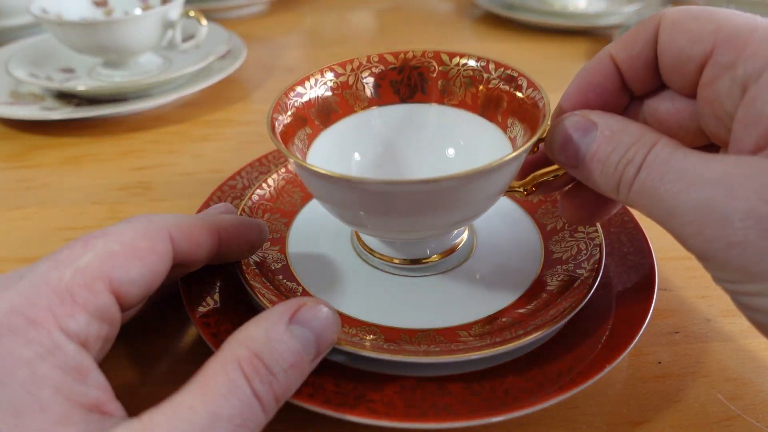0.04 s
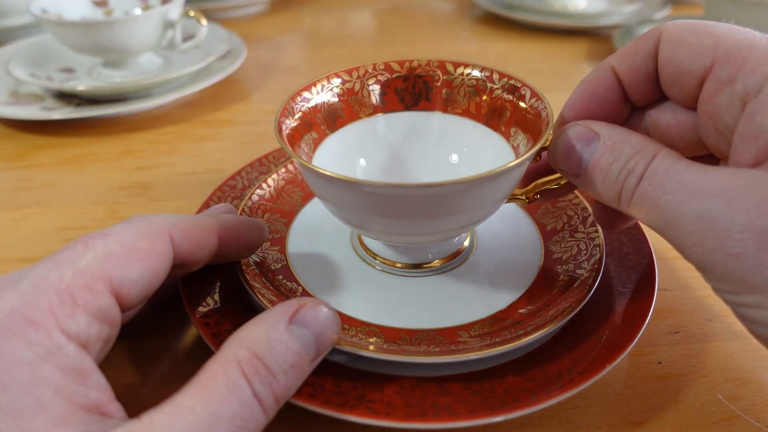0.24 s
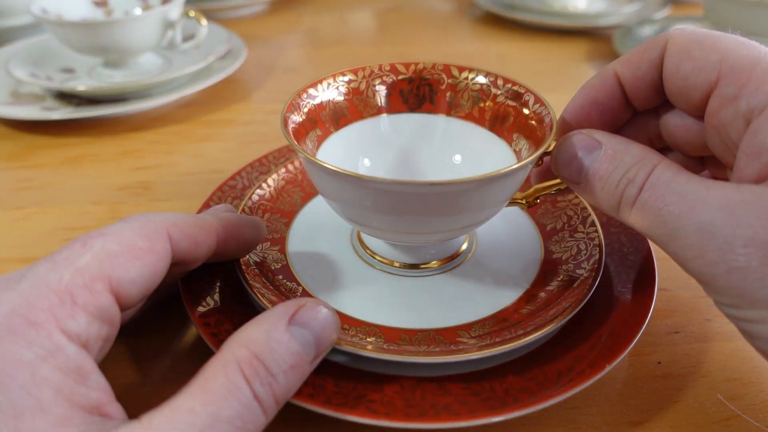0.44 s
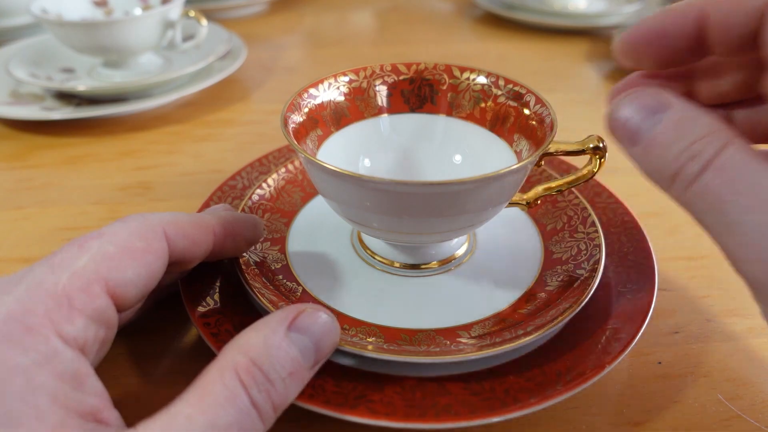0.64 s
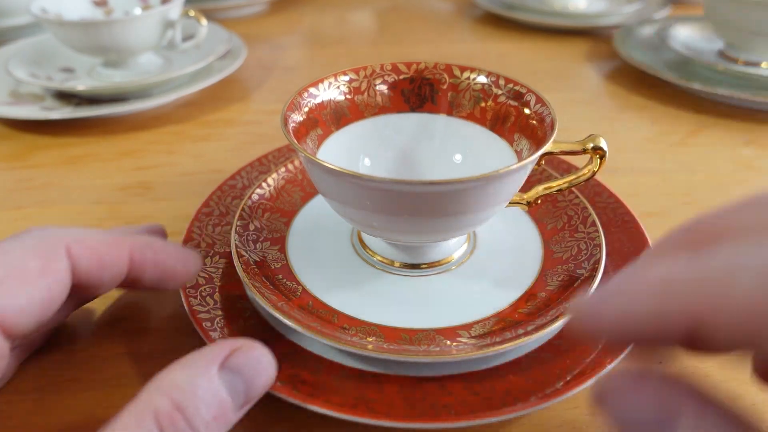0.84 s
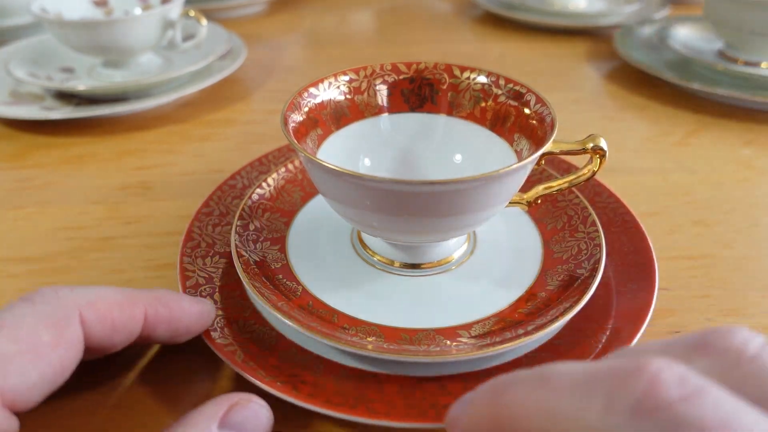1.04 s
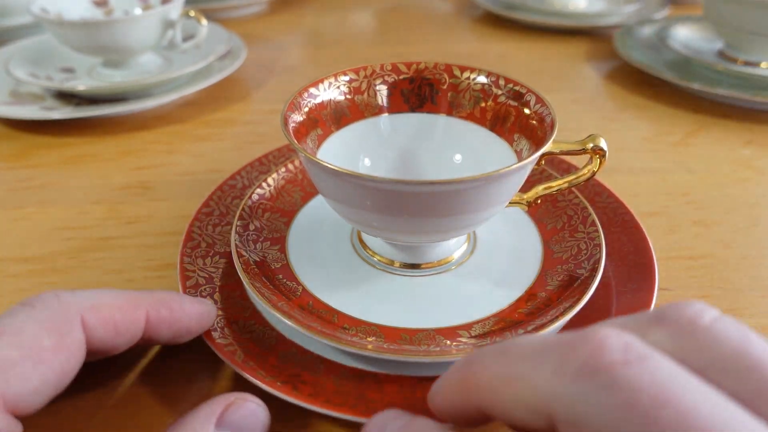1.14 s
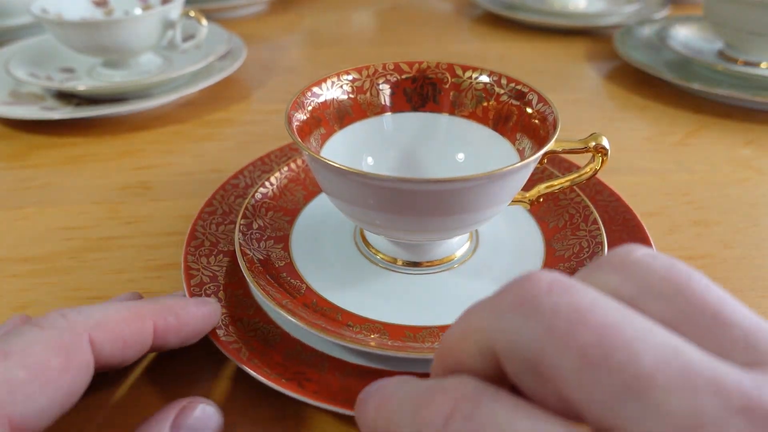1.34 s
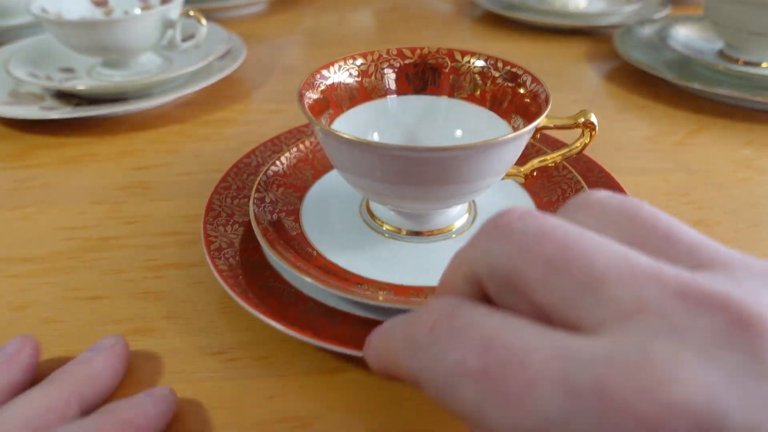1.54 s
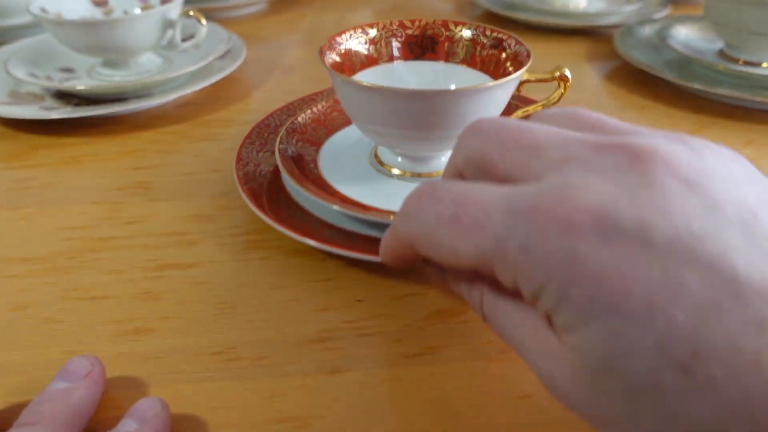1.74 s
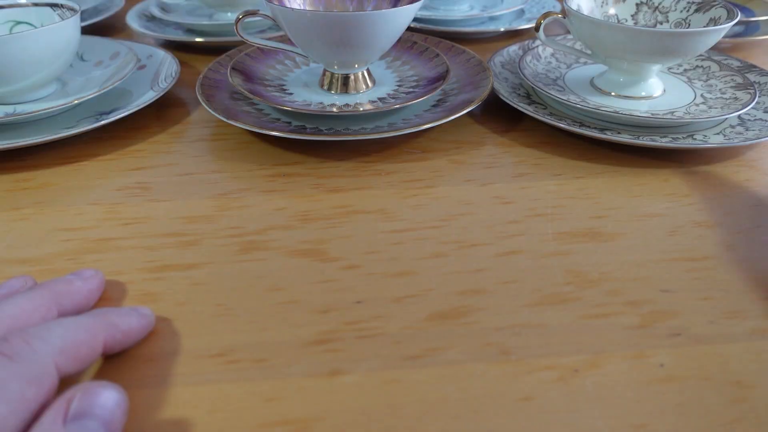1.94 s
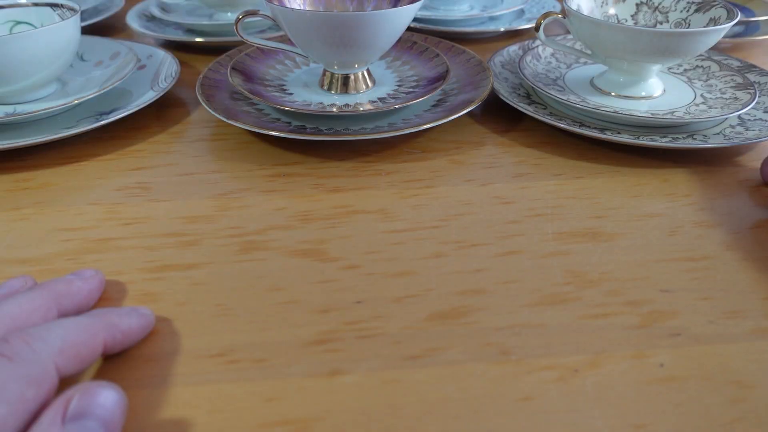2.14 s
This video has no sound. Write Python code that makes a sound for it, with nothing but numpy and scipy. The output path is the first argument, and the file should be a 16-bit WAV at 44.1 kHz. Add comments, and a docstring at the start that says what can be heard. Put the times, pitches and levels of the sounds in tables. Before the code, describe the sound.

Close by in a quiet room, a teacup lands on its saucer with two bright, ringing clinks. Fingers brush faintly, then the stacked dishes slide over a wooden tabletop with a swelling, gritty scrape that cuts off.

```python
"""A porcelain cup is set down on its saucer, which sits on a plate on a wooden table in a quiet room.
One edge of its foot clinks first; then it drops flat, rattles the stack and settles with tiny pings.
Each hit makes the dishes ring with many fading tones. Fingers brush softly, and the plate is pushed
over the wood: thousands of tiny slips make a scrape that grows louder until it is cut off short."""
import sys
import numpy as np
from scipy import signal
from scipy.fft import rfft, irfft
from scipy.io import wavfile

SR = 44100
rng = np.random.default_rng(int(sys.argv[2]) if len(sys.argv) > 2 else 0)


def master(y):
    """Save y as 16-bit WAV."""
    cut = np.clip(np.atleast_2d(y).T, -1, 1)
    pcm = np.round(cut * 32767)  # scale
    wavfile.write(sys.argv[1], SR, pcm.astype(np.int16))


N = 97020
TIME = np.arange(N) / SR

# The cup's foot hits the saucer. Each row: start in seconds, place (0 near edge, 1 far edge),
# cup level in dB, ring time multiplier, then the levels of plate, clack and table knock in dB.
HITS = [(0.2143, 0, 0.5, 1.15, -59, -36.5, -54), (0.2218, 0.3, -14.5, 1.04, -59, -47, -49),
        (0.4152, 0.93, -1.5, 0.77, -36, -29.5, -39), (0.4225, 1, -11, 0.52, -40, -34, -42),
        (0.4298, 0.85, -18, .7, -53, -43, -39)]
# The tones the plate rings with. Each row: pitch in Hz, width in Hz, relative level in dB,
# dB gained for each dB of push.
PLATE_TONES = [(465, 81, -8.5, 1.5), (805, 51, -7.5, 3.5), (1075, 74, 0, 1.4), (1148, 67, 2, 1.3),
               (1320, 104, -4.5, 1.5), (1498, 125, -5, 0.74), (1900, 156, -9, 0.45), (2657, 194, -4.5, 1),
               (3230, 180, -10.5, 1.3), (3927, 100, -2, 1.18), (4885, 67, -8, 1.5), (5366, 97, -11, 1.2),
               (5720, 45, -11, 2), (6850, 55, -10.5, 1.4), (7180, 45, -10.5, 1.05), (7810, 84, -16, 1.5),
               (9210, 55, -19, 1), (10160, 48, -19.5, 1.3)]
DISH_LOWEST_HZ = 260  # small dishes give off no bass


def from_db(db):
    """Turn decibels into a number to multiply by."""
    return 10 ** (np.asarray(db) / 20)


def unit_level(x):
    """Scale a signal so that its average (rms) level is 1."""
    return x / np.sqrt(np.mean(x ** 2) + 1e-20)


def at_hz(points, hz):
    """Read between the rows of a table whose first column is frequency."""
    row_hz, values = np.transpose(points)
    return np.interp(np.log(hz + 1e-3), np.log(row_hz), values)


def coloured(x, spectrum):
    """Make some frequencies stronger than others, then set the level to 1."""
    hz = np.arange(N // 2 + 1) * SR / N
    return unit_level(irfft(rfft(x) * from_db(at_hz(spectrum, hz)), N))


def noise(spectrum):
    """Noise at level 1 with the given tone colour."""
    return coloured(rng.standard_normal(N), spectrum)


def drift(hz):
    """A slow random wobble at level 1."""
    smoothing = signal.butter(2, hz, fs=SR, output="sos")
    return unit_level(signal.sosfilt(smoothing, rng.standard_normal(2 * N))[N:])


def fade_in(start, rise_s):
    """A curve that climbs from 0 toward 1."""
    return 1 - np.exp(-np.maximum(TIME - start, 0) / rise_s)


def dying(start, ring_s):
    """A curve that jumps to 1, then falls by 60 dB in the ring time."""
    return (TIME >= start) * np.exp(-np.log(1000) * np.maximum(TIME - start, 0) / ring_s)


def ring(start, hz, ring_s):
    """One struck tone that fades away."""
    return dying(start, ring_s) * np.sin(2 * np.pi * hz * (TIME - start))


def resonate(x, hz, width_hz):
    """Let a signal ring in a band around one pitch."""
    r = np.exp(-np.pi * width_hz / SR)
    feedback = [1, -2 * r * np.cos(2 * np.pi * hz / SR), r * r]
    return signal.lfilter(np.array([1, 0, -1]) * (1 - r * r) / 2, feedback, x)


def high_pass(x, hz, order=1):
    """Take out what lies below hz."""
    return signal.sosfilt(signal.butter(order, hz, "high", fs=SR, output="sos"), x)


def stereo(mid, side):
    """Make left and right from a shared part (mid) and an opposite part (side)."""
    return np.array([mid + side, mid - side])


def background(air_db=-64.5, width=0.18, waver=0.2):
    """The quiet room: low rumble, faint hiss and a wavering hum."""
    # Rumble and hiss. Each row: frequency in Hz, relative level in dB.
    air_spectrum = [(12, -33), (20, 2), (103, -8), (133, -9.5), (161, -10), (225, -8), (259, -12.5),
                    (705, -15.5), (834, -16.5), (958, -18), (1770, -21), (1980, -22.5), (15500, -30)]
    # The room's hum. Each row: pitch in Hz, level in dB.
    hum_tones = [(58.5, -71.5), (133, -77), (222, -79)]
    mid, side = (from_db(air_db) * noise(air_spectrum) for _ in range(2))
    for hz, db in hum_tones:
        tone = (1 + waver * drift(2.3)) * np.sin(2 * np.pi * hz * TIME + drift(5.8))
        mid += from_db(db) * unit_level(tone)
    return stereo(mid, width * side)


def room(x, pan_db, echo_db=-8.5, width=0.49):
    """Add echoes that circle between the walls and die faster in the treble."""
    # How long the room rings. Each row: frequency in Hz, ring time in seconds.
    ring_times = [(300, 0.7), (800, 0.43), (2000, 0.56), (5500, 0.41), (12000, 0.22)]
    hz = np.arange(N + 1) * SR / (2 * N)
    decay = np.log(1000) / at_hz(ring_times, hz)
    delay = -2j * np.pi * hz  # exp(delay * s) makes a sound s seconds late
    mid = side = 0
    for k, trip_s in enumerate(np.geomspace(0.0193, 0.0587, 16)):
        first_s = trip_s * 0.23 * (1 + k % 3)
        echoes = np.exp(delay * first_s) / (1 - np.exp(trip_s * (delay - decay)))
        mid += (-1) ** k * echoes
        side += (-1) ** (k // 2) * echoes
    # Things on the table scatter each echo.
    bounces = [np.exp(delay * s) for s in (0.0013, 0.0031, 0.0047)]
    scatter = np.prod([(bounce - 0.5) / (1 - 0.5 * bounce) for bounce in bounces], axis=0)
    walls = from_db(echo_db) * scatter * stereo(mid, width * side) / np.std(mid)
    reverb = irfft(rfft(x, 2 * N) * walls, 2 * N)[:, :N]
    # Only the treble leans to one side; a negative pan_db means right.
    lean = high_pass(x, hz=1600) * (from_db([[pan_db], [-pan_db]]) - 1)
    return x + reverb + lean


def fingers():
    """Soft swells of rubbing as the hands change their grip."""
    # Brushes and taps. Each row: peak time and length in seconds, level in dB, pitch and width in Hz.
    brushes = [(1.043, 0.062, -75.5, 6130, 60), (1.024, 0.056, -77, 5040, 450),
               (1.147, 0.038, -69.5, 810, 160), (1.14, 0.037, -72.5, 2700, 1400),
               (2.014, 0.0056, -61.5, 2200, 1200), (2.12, 0.056, -74, 2800, 1300)]
    out = np.zeros(N)
    for peak_s, length_s, db, hz, width_hz in brushes:
        swell = np.exp(-2 * ((TIME - peak_s) / length_s) ** 2)
        out += from_db(db) * swell * unit_level(resonate(rng.standard_normal(N), hz, width_hz))
    return out


def plate_scrape(slips_per_s=4600, spread_db=3, plate_db=-0.5, grit_db=-7.5, wood_db=-11):
    """Tiny slips make the plate ring; the table top joins in as the push grows."""
    # Strength of the push. Each row: time in seconds, level in dB.
    push = [(1.38, -93), (1.45, -61.5), (1.555, -53), (1.575, -50.5), (1.65, -47.5), (1.69, -47),
            (1.75, -44.5), (1.83, -43.5), (1.918, -44)]
    # The plate's foot snags on the grain. Each row: time in seconds, extra level in dB.
    snags = [(1.571, 1.42), (1.651, 4.2), (1.715, 3.5), (1.81, 1.5), (1.851, 2), (1.892, 3.3)]
    # The rubbing of the foot. Each row: frequency in Hz, relative level in dB.
    grit_spectrum = [(200, -37), (700, -21), (1100, -2.5), (1600, 1.5), (2600, -0.5), (3500, -1.5),
                     (4400, -12), (5500, -7), (7500, -15), (9000, -33), (12000, -43), (16000, -41)]
    # The shaken table top. Each row: frequency in Hz, relative level in dB.
    wood_spectrum = [(150, -44), (280, -10), (420, -0.5), (650, -1.5), (1130, 0.5), (1700, -14),
                     (4500, -6.5), (8000, -17), (11500, -19), (15500, -33)]
    push_db = np.interp(TIME, *np.transpose(push), left=-140)
    peak_db = push_db.max()
    swell_db = push_db - peak_db
    snag_db = sum(db * np.exp(-((TIME - s) / 0.0043) ** 2) for s, db in snags)
    sizes = from_db(snag_db + spread_db * np.minimum(rng.exponential(1, N), 4))
    slips = sizes * rng.choice([-1, 1], N) * (rng.random(N) < slips_per_s / SR)
    steady = swelling = 0
    for k, (hz, width_hz, db, growth) in enumerate(PLATE_TONES):
        tone = (-1) ** k * from_db(db) * resonate(slips, hz, width_hz)
        steady += tone
        swelling += tone * from_db(growth * swell_db)
    plate = from_db(plate_db) * swelling / np.std(steady)
    grit = from_db(grit_db + swell_db) * coloured(slips * rng.choice([-1, 1], N), grit_spectrum)
    wood = from_db(wood_db + 3 * swell_db) * coloured(slips * rng.choice([-1, 1], N), wood_spectrum)
    return from_db(peak_db) * high_pass(plate + grit + wood, DISH_LOWEST_HZ, order=3)


def stack_shimmer(level_db=-45.5):
    """While the cup is tilted the stack rings on faintly; landing flat damps it."""
    # Many weak, close tones blurred into noise. Each row: frequency in Hz, relative level in dB.
    shimmer_spectrum = [(300, -21), (800, -5.5), (1300, -7), (1460, 6), (1650, -10), (2200, -8.5),
                        (2480, 1.5), (2900, -9.5), (3400, -20.5), (3900, -13), (4200, -17), (4500, -4),
                        (4900, -22), (5450, -13), (6200, -28), (6800, -13), (7400, -25.5), (12000, -39)]
    touch_s, seated_s = HITS[0][0], HITS[-1][0]
    damping = (TIME < seated_s) + dying(seated_s, ring_s=0.1)
    return from_db(level_db) * dying(touch_s, ring_s=1.1) * damping * noise(shimmer_spectrum)


def cup_pings():
    """The rocking cup grazes the saucer, waking one tone with each touch."""
    # Light touches. Each row: start in seconds, pitch in Hz, level in dB, ring time in seconds.
    touches = [(0.4086, 3076, -35.5, 0.066), (.4065, 4650, -51, 0.066), (0.4082, 6890, -41, 0.037),
               (.545, 5890, -57.5, 0.24), (0.547, 6820, -59.5, 0.18), (0.544, 8640, -57.5, .04),
               (0.58, 8800, -64, 0.074), (.581, 1334, -53.5, 0.21)]
    return sum(from_db(db) * fade_in(start, rise_s=0.00078) * ring(start, hz, ring_s)
               for start, hz, db, ring_s in touches)


def cup_clinks(top_hz=13000):
    """Each hit rings the cup and the plate, with a clack of the stack and a knock of the wood."""
    # The tones of cup and saucer. Each row: pitch in Hz, base ring time in seconds,
    # relative level in dB when hit at the near edge, and when hit at the far edge.
    cup_tones = [(1060.6, 0.26, -44, -42), (1358, 0.19, -48, -48), (1449, 0.51, -48, -46),
                 (1494, 0.11, -46.5, -35.5), (1594, 0.095, -44.5, -33), (1888, 0.23, -51, -50),
                 (2428, 0.073, -37, -39.5), (2500, 0.32, -47, -48.5), (2645, 0.049, -37, -53),
                 (2770, 0.062, -40, -63), (2910, 0.061, -40, -37), (3082, 0.11, -58, -34),
                 (3820, 0.11, -46.5, -40), (3998, 0.086, -64, -38), (4510, 0.22, -57, -54),
                 (4500, 0.39, -52, -59), (4864, 0.12, -70, -39), (5417, 0.13, -42, -32.5),
                 (5680, 0.13, -59, -39.5), (6300, 0.063, -68, -43), (6730, 0.093, -40.5, -34.5),
                 (7630, 0.12, -61, -52), (8594, 0.1, -45.5, -41.5), (9130, 0.093, -64, -41.5),
                 (10100, 0.078, -55.5, -44.5), (11120, .04, -75, -46), (11850, 0.079, -56, -40.5)]
    # The short, dense ring of the whole stack. Each row: frequency in Hz, relative level in dB.
    clack_spectrum = [(200, -42), (500, -12.5), (900, -9), (1500, -2.5), (2000, -7.5), (2700, -2.5),
                      (3400, -12), (4500, -9), (5500, -5.5), (6200, -21), (7000, -13.5), (9500, -33),
                      (12000, -45), (16000, -56)]
    # The wood under the stack. Each row: frequency in Hz, relative level in dB.
    knock_spectrum = [(120, -42), (250, -11), (450, -1), (700, 2), (1050, 3.5), (1700, -3), (3000, -37),
                      (8000, -52)]
    out = stack_shimmer()
    for start, place, cup_db, stretch, plate_db, clack_db, knock_db in HITS:
        for k, (hz, ring_s, near_db, far_db) in enumerate(cup_tones):
            tone_db = cup_db + (1 - place) * near_db + place * far_db
            out += (-1) ** k * from_db(tone_db) * ring(start, hz, ring_s * stretch)
        for k, (hz, width_hz, db, _) in enumerate(PLATE_TONES):
            ring_s = np.log(1000) / (np.pi * width_hz)  # narrow tones ring longer
            out += (-1) ** k * from_db(plate_db + db) * ring(start, hz, ring_s)
        out += from_db(clack_db) * dying(start, ring_s=0.078) * noise(clack_spectrum)
        knock_shape = fade_in(start, rise_s=0.0024) * dying(start, ring_s=0.11)
        out += from_db(knock_db) * knock_shape * noise(knock_spectrum)
    # The glaze softens each hit.
    softened = signal.sosfilt(signal.butter(10, top_hz, fs=SR, output="sos"), out)
    return high_pass(softened, DISH_LOWEST_HZ, order=3)


def scene(scrape_end_s=1.918):
    """Clinks, then the scrape, which stops dead together with its echoes."""
    cup_and_hands = room(cup_clinks() + cup_pings() + fingers(), pan_db=-1.3)
    scrape = room(plate_scrape(), pan_db=-0.8)
    cut = np.clip((scrape_end_s - TIME) / 0.001, 0, 1)
    return cup_and_hands + cut * scrape + background()


def record(dry):
    """Draw the bass toward the middle and cut off the highest treble."""
    left, right = dry
    heard = stereo((left + right) / 2, high_pass((left - right) / 2, hz=660))
    return signal.sosfilt(signal.ellip(10, 0.1, 70, 15800, fs=SR, output="sos"), heard)


dry = scene()
out = record(dry)
master(out)
```